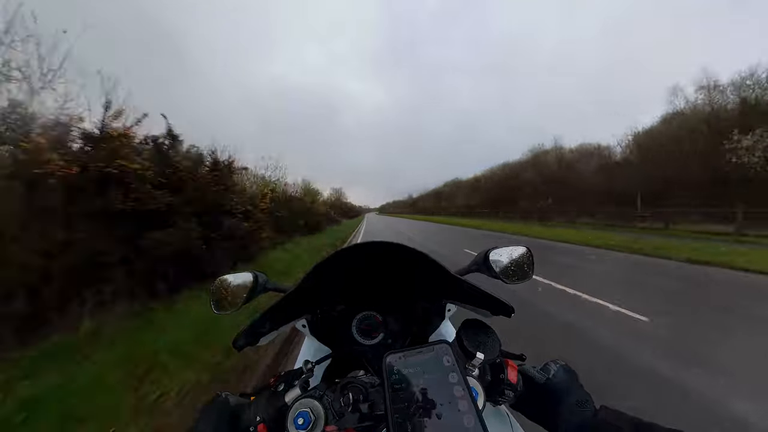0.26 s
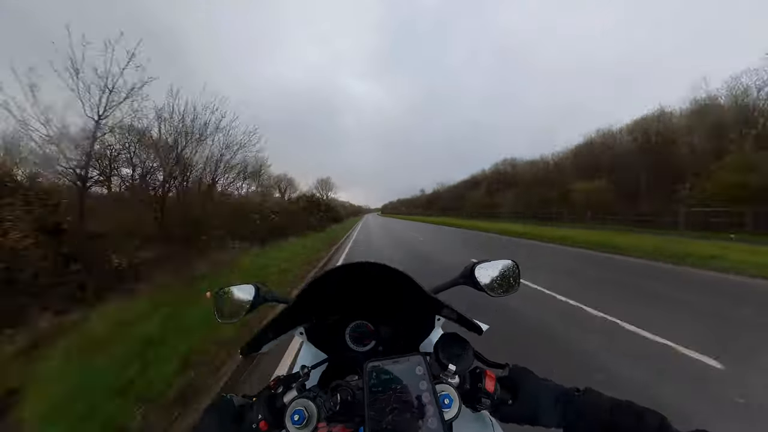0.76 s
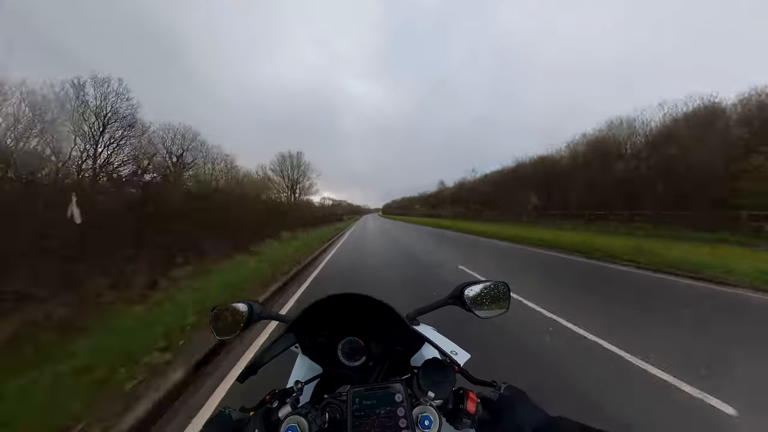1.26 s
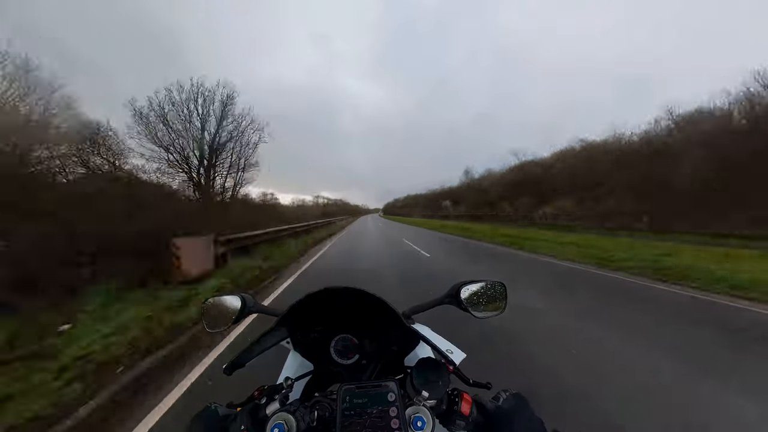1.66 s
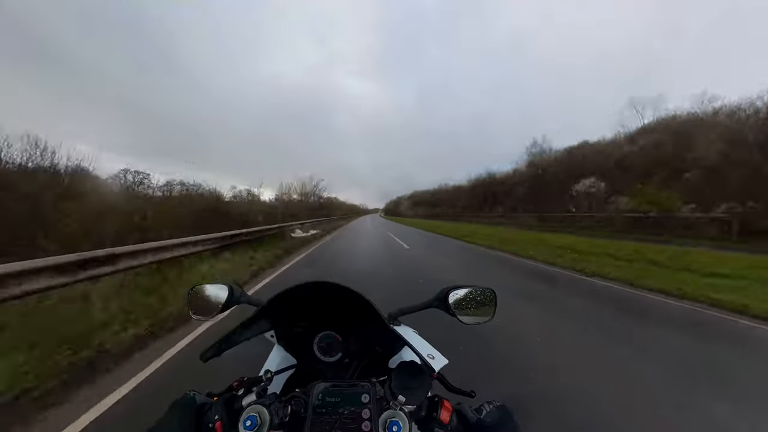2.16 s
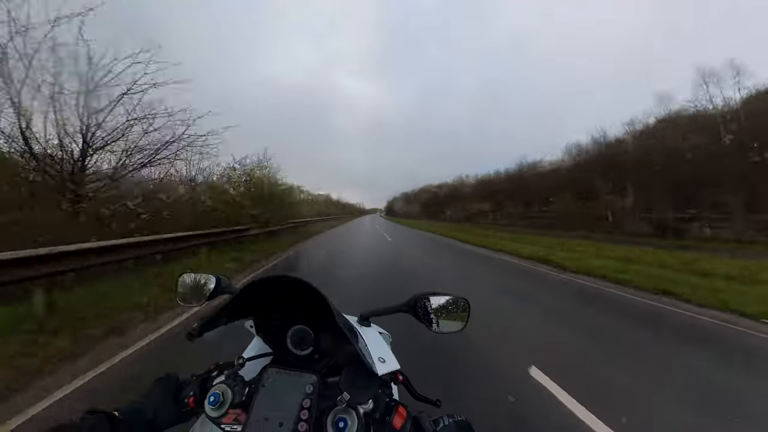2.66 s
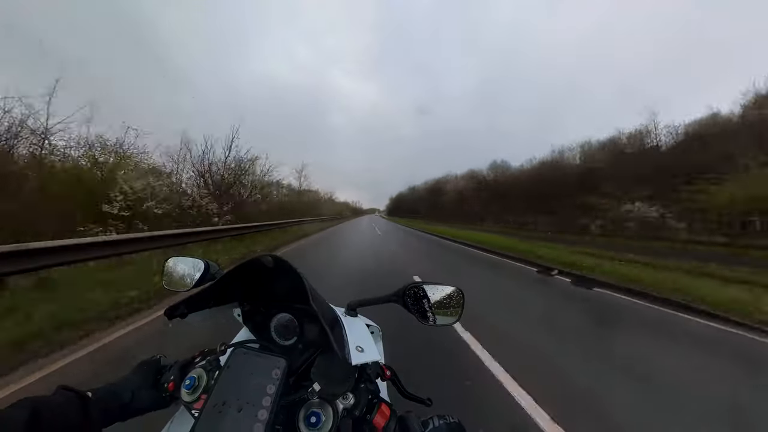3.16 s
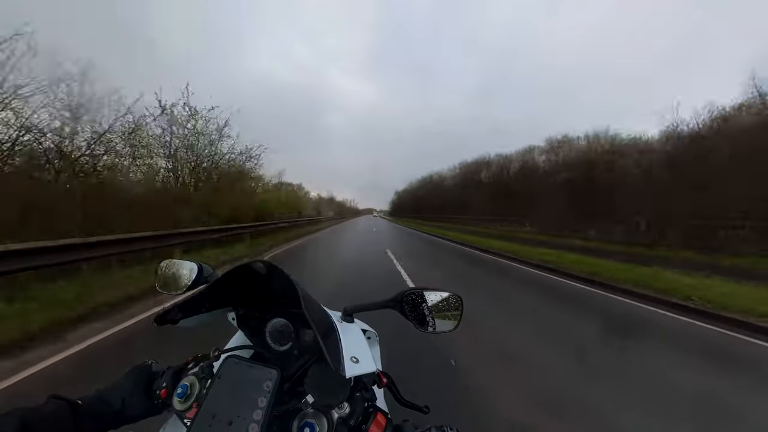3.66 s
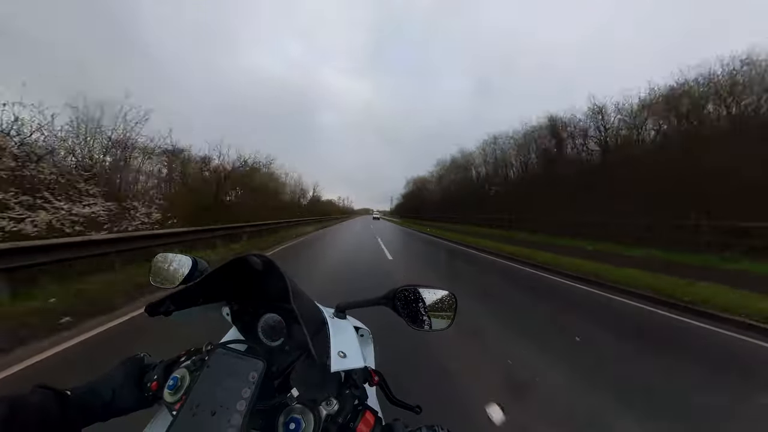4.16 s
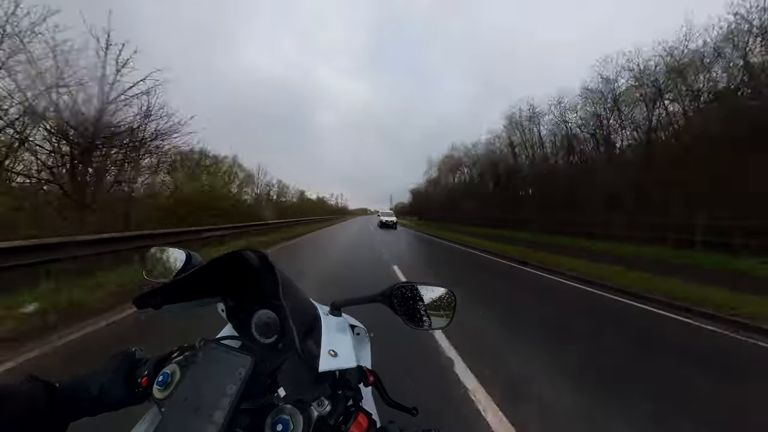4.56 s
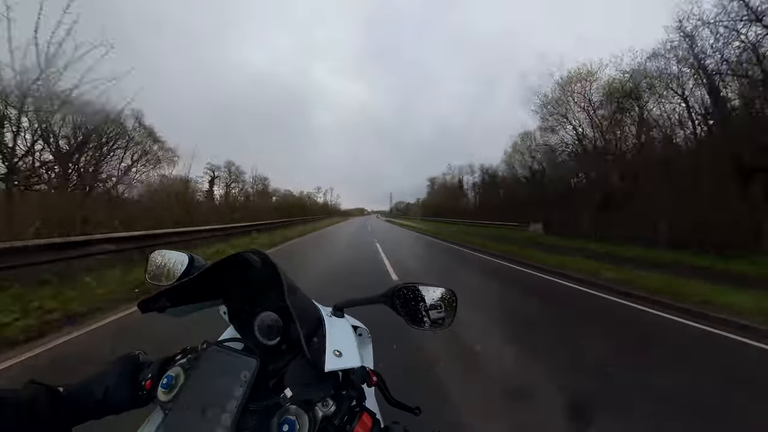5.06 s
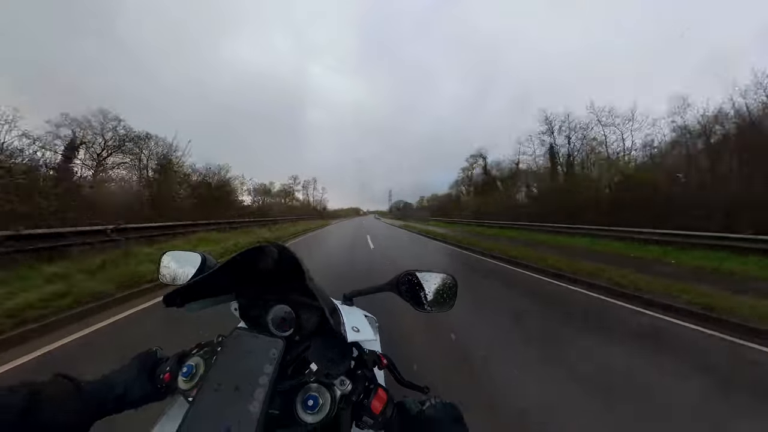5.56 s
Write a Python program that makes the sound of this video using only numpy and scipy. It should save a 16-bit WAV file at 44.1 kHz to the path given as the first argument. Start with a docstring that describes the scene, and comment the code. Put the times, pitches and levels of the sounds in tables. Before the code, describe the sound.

A four-cylinder motorcycle rides along a wet road, heard from a sheltered microphone on board. The engine pulls for about a second, with a brief rising whoop, then eases into a hum that slowly sinks in pitch. Wind thumps and roars throughout, tyres and spray hiss, and grit and drops tick irregularly on the bike's front shell.

```python
"""On a wet road, aboard a four-cylinder motorcycle. The firing cylinders hum as the engine pulls for
about a second, then eases off. Wind thumps and roars at the sheltered microphone, tyres and spray hiss,
and grit and drops tick on the fairing (the bike's front shell). A brief rising whoop sounds early on.
The recorder's gain control evens out the gusts."""
import sys
import numpy as np
from scipy import signal
from scipy.fft import rfft, irfft, next_fast_len
from scipy.io import wavfile
from scipy.ndimage import uniform_filter1d, map_coordinates

SR = 44100
rng = np.random.default_rng(int(sys.argv[2]) if len(sys.argv) > 2 else 0)


def log_audio(samples):
    """Write samples as a 16-bit WAV file to the path given in sys.argv[1]."""
    # one column per channel
    frames = np.atleast_2d(samples).T
    # limit to full scale, then quantise
    limited = np.clip(frames, -1, 1)
    pcm = np.round(limited * 32767).astype(np.int16)
    wavfile.write(sys.argv[1], SR, pcm)


N = 256662

# How often the cylinders fire: time_s, firing_hz
FIRING_RATE = [(0, 267.8), (.3, 272.4), (.62, 277.2), (.72, 276.6), (.85, 269.6), (1, 271.3), (1.4, 263),
               (2, 251.5), (2.4, 245.2), (2.6, 245.4), (2.85, 242), (3.4, 238.9), (4.2, 235.9), (5, 234.1),
               (5.55, 234.2), (5.68, 235.3), (5.82, 232)]
# How hard the engine works: time_s, hum_db, throttle (0 shut, 1 full)
ENGINE_EFFORT = [(0, -25.5, 0.96), (.3, -27, 0.77), (.55, -28.5, 0.91), (.68, -30.5, 0.72),
                 (.8, -30.5, 0.1), (1, -31.5, 0), (1.2, -28.5, 0.03), (1.7, -27, 0.1), (2.15, -29, 0),
                 (2.33, -33.5, 0), (2.5, -31, 0), (2.9, -30, 0), (3.4, -29, 0.2), (4.1, -30, 0),
                 (4.5, -29, 0.56), (5.3, -28, 0.34), (5.82, -33.5, 0.6)]
# Tones above the hum, by multiple of a quarter of the firing rate.
# Their levels next to the hum, by throttle: shut_db, half_db, full_db
OVERTONES = {5: (-21, -30, -30), 6: (-24, -26, -8), 7: (-29, -40, -30), 8: (-29, -18, -28),
             10: (-36, -23.5, -34), 11: (-40, -33, -42), 12: (-33, -37, -28), 14: (-42, -35, -26),
             15: (-38, -33, -42), 16: (-36, -44, -26), 18: (-42, -44, -41), 19: (-46, -41, -35),
             20: (-41, -44, -42), 21: (-46, -46, -36), 22: (-43, -39, -43), 23: (-43, -39, -41)}
# Gusts: time_s, wind_db (0 is average), buffet_db
GUSTS = [(.1, 3, -24), (.3, 0.5, -27.5), (.5, 3.5, -25.5), (.7, 2, -24), (.9, 1.5, -24.5),
         (1.3, 1.5, -27.5), (1.7, -0.5, -25.5), (2.1, -2, -28.5), (2.5, -1.5, -27.5), (2.9, 1, -26),
         (3.3, 0, -26.5), (3.6, 0.5, -29), (3.9, 0.5, -27), (4.2, 2, -25), (4.4, -1, -29), (4.7, 0, -27.5),
         (5.1, 0.5, -26.5), (5.45, 0.5, -28), (5.7, 0, -26.5)]
# Extra hiss from water on the road: time_s, wet_db
WETNESS = [(0, 3.5), (.45, -.5), (.7, 2.5), (.95, 0), (1.4, 0.5), (2.1, -1), (2.9, 0), (3.8, -.5),
           (4.6, -0.5), (5.2, 0), (5.82, 0.5)]
# The tone of each noise made by wind and spray: pitch_hz, level_db
BUFFET_TONE = [(30, -34.5), (60, 0.5), (90, 1), (150, -3.5), (210, -7.5), (300, -12), (450, -19.5),
               (700, -36), (1200, -96)]
RUMBLE_TONE = [(12, -48), (25, 1), (40, 17.5), (55, 13), (75, 3.5), (110, -12.5), (200, -62)]
ROAR_TONE = [(150, -29), (330, 5.5), (450, 3), (600, 3), (850, 1.5), (1100, -6), (1500, -13), (2000, -24.5),
             (3000, -73.5)]
SPRAY_TONE = [(900, -28.5), (1500, -4), (1800, -2), (2600, 0.5), (3300, -6.5), (4000, -11.5), (4800, -15.5),
              (5450, -14), (6200, -20), (6900, -28.5), (7600, -40), (8400, -53.5), (12000, -100)]
# The loudest grit hits: start_s, level_db, pitch_hz, width_octaves, treble_db (added to level_db)
GRIT_HITS = [(0.11, -39.5, 2700, 0.41, -9.5), (0.142, -48, 2610, 0.26, -3), (0.1642, -41, 3360, 0.25, -28),
             (0.1915, -33.5, 2650, 0.13, -14), (0.2075, -60, 4300, 0.2, 5), (0.255, -51, 3170, 0.26, -2),
             (0.2842, -50, 2970, 0.14, -2), (0.303, -48, 3650, 0.28, -2), (0.408, -43.5, 2330, 0.25, -6),
             (0.4677, -53, 4210, 0.16, -1), (0.6373, -51, 3170, 0.22, -1), (0.8366, -52, 3520, 0.38, -1),
             (0.9052, -58.5, 3650, 0.13, 7), (0.9831, -50, 3210, 0.18, -5), (0.993, -46, 3170, 0.3, -7.5),
             (1.047, -57, 3900, 0.2, 1), (1.0643, -49, 2800, 0.29, -5), (1.2518, -41, 2990, 0.16, -17),
             (1.2796, -39, 3020, 0.16, -27), (1.3218, -51, 2620, 0.22, -9.8),
             (1.3314, -40.5, 2870, 0.34, -8), (1.448, -45.5, 3310, 0.2, -10),
             (1.5396, -39.5, 3140, 0.33, -17), (1.5897, -51, 2780, 0.2, -18), (1.679, -43, 2960, 0.37, -13),
             (1.7094, -50, 4050, 0.31, -2), (1.8332, -42, 2500, 0.26, -25), (1.845, -39.5, 2890, 0.31, -13),
             (1.8561, -58, 3160, 0.25, 3), (1.876, -51, 2110, 0.13, -1.6), (1.9168, -48.5, 3690, 0.19, -26),
             (2.1575, -37, 2300, 0.37, -10), (2.1666, -52, 3830, 0.14, -18.5), (2.206, -44, 2780, 0.14, -9),
             (2.2192, -40, 3860, 0.23, -21), (2.308, -50, 4030, 0.13, -2), (2.507, -47, 2820, 0.24, -10),
             (2.389, -57, 4000, 0.3, 1), (2.5325, -41, 2740, 0.31, -10), (2.5908, -40.5, 3700, 0.4, -14),
             (2.6912, -47, 2820, 0.31, -21), (2.7316, -46, 3630, 0.15, -9.0),
             (2.8149, -41, 2550, 0.33, -9.5), (2.8977, -55, 2990, 0.34, -1), (2.9072, -42, 3140, 0.22, -17),
             (2.9591, -46.5, 3020, 0.37, -0.5), (2.9855, -49, 3310, 0.24, -15),
             (3.0603, -44, 2970, 0.19, -28), (3.12, -44, 3790, 0.26, -11), (3.1456, -42, 2310, 0.26, -19),
             (3.2295, -56.2, 4330, 0.13, 6), (3.2594, -48, 2720, 0.46, -7.6),
             (3.2663, -37, 3150, 0.29, -18), (3.2725, -49, 3810, 0.16, -11), (3.3387, -46, 2840, 0.32, -12),
             (3.345, -42, 2670, 0.18, -18), (3.366, -43, 2680, 0.36, -7), (3.3891, -42, 3380, 0.24, -8.9),
             (3.4056, -49, 3460, 0.31, -4), (3.421, -46.4, 3870, 0.2, -12.5), (3.459, -48, 4050, 0.13, -9),
             (3.5163, -54.3, 4310, 0.13, -3.1), (3.5223, -47, 2490, 0.47, -4),
             (3.551, -44, 3480, 0.16, -14.4), (3.6036, -42.5, 2840, 0.33, -12),
             (3.665, -40.5, 3050, 0.29, -10), (3.8114, -41, 4020, 0.19, -9),
             (3.828, -44.7, 2530, 0.45, -15), (3.857, -49, 3860, 0.14, -1), (3.884, -60, 4200, 0.2, 5),
             (3.9184, -46, 3170, 0.15, -16), (4.0501, -43.5, 2600, 0.14, -20),
             (4.106, -43.5, 2560, 0.43, -8.5), (4.1598, -54, 2470, 0.44, 1),
             (4.1776, -39.5, 2830, 0.34, -9), (4.2432, -42, 2500, 0.29, -20),
             (4.255, -40.5, 3000, 0.19, -23), (4.519, -51, 4000, 0.12, -21), (4.532, -53, 3090, 0.16, 0),
             (4.538, -39.5, 2620, 0.41, -11), (4.5448, -32.5, 3480, 0.14, -13),
             (4.551, -46, 3220, 0.2, -21), (4.6103, -43.9, 3790, 0.37, -3), (4.625, -47, 2980, 0.28, -12),
             (4.634, -43.5, 2400, 0.42, -4), (4.6916, -46, 2900, 0.25, -23), (4.749, -41, 2660, 0.13, -23),
             (4.7545, -47.1, 2800, 0.2, -18), (4.9051, -49.5, 2750, 0.29, -8),
             (4.9461, -55, 3070, 0.38, -1), (5.0134, -48, 2300, 0.43, -5), (5.09, -38, 2720, 0.11, -30),
             (5.0967, -41.5, 3000, 0.24, -12), (5.195, -38.5, 3240, 0.31, -9.5),
             (5.2524, -45, 2520, 0.2, -24), (5.2938, -41.5, 3350, 0.21, -24), (5.322, -57, 4200, 0.2, 1),
             (5.367, -42, 3160, 0.21, -14.3), (5.427, -33.5, 3200, 0.27, -17),
             (5.4903, -54.5, 2230, 0.36, -6), (5.5472, -41.8, 2770, 0.24, -19.5),
             (5.5527, -45, 2860, 0.22, -11), (5.615, -41, 3780, 0.13, -4.5),
             (5.649, -35.5, 2700, 0.28, -18), (5.6587, -37, 3380, 0.17, -20),
             (5.7007, -40.5, 2680, 0.36, -12), (5.758, -60, 4150, 0.2, 9), (5.7702, -41, 3510, 0.32, -10.6)]
# The notes the fairing rings at: pitch_hz, level_db, ring_s (time to fade by 60 dB)
FAIRING_NOTES = [(1250, -1.5, .015), (1690, 1.5, .015), (2110, 3.5, 0.019), (2440, 2.5, 0.014),
                 (2630, 1.5, 0.016), (3023, 3.5, 0.014), (3400, 1.5, 0.013), (3970, 2.5, 0.014),
                 (4390, 2, 0.014), (5336, 2, 0.0093), (6000, -4, 0.0091), (6550, -9, 0.011),
                 (7350, -15, 0.0071)]
# How the microphone's housing colours the treble: pitch_hz, gain_db
HOUSING_TONE = [(3100, 0), (3500, -1), (3950, 1.5), (4400, 0.5), (4800, -1.5), (5150, 1.5)]


def amp(db):
    """Turn decibels into a gain."""
    return 10 ** (np.asarray(db) / 20)


def unit(x):
    """Scale x to an average (rms) level of 1."""
    return x / np.sqrt(np.mean(x ** 2) + 1e-20)


def curves(rows):
    """One value per sample for each column after the time."""
    time_s, *columns = np.transpose(rows)
    return [np.interp(np.arange(N) / SR, time_s, column) for column in columns]


def wobble(rate_hz):
    """A smooth curve through rate_hz random points a second."""
    points = rng.standard_normal(int(N * rate_hz / SR) + 4)
    return map_coordinates(points, [np.arange(N) * rate_hz / SR])


def filtered(x, gain_at):
    """Scale each frequency in x by gain_at(hz)."""
    size = next_fast_len(N + 8192)
    return irfft(rfft(x, size) * gain_at(np.fft.rfftfreq(size, 1 / SR)), size)[:N]


def colour(x, tone):
    """Shape x with a tone table and bring it to level 1."""
    pitch_hz, db = np.transpose(tone)
    return unit(filtered(x, lambda hz: amp(np.interp(np.log(hz + 1), np.log(pitch_hz), db))))


def engine():
    """Firing cylinders make a hum. They are not quite equal, adding tones that change with throttle."""
    (firing_hz,) = curves(FIRING_RATE)
    hum_db, throttle = curves(ENGINE_EFFORT)
    cycle = np.pi / 2 * np.cumsum(firing_hz) / SR  # one turn for every four firings
    sound = amp(1.1 * wobble(10)) * np.sin(4 * cycle + .12 * wobble(15))  # the fuel burns unevenly
    for multiple, levels_db in OVERTONES.items():
        level_db = np.interp(throttle, [0, .5, 1], levels_db) + 1.2 * wobble(7) + 1.8 * wobble(30)
        phase = multiple * cycle + .045 * multiple * wobble(16) + rng.uniform(0, 2 * np.pi)
        sound += amp(level_db) * np.sin(phase)
    return np.sqrt(2) * amp(hum_db) * sound


def eddies(count, spread_db):
    """Swirls of air kick the microphone at random, pushing more often than pulling."""
    when, direction, strength = rng.uniform(size=(count, 3)).T
    kicks = np.sign(direction - .3) * amp(-spread_db * np.log(strength))
    return unit(np.bincount((when * N).astype(int), kicks, N))


def rush(patchy_db):
    """Rushing noise, with louder and softer patches across pitch and time."""
    spectrum = signal.stft(rng.standard_normal(N), nperseg=512)[2]
    patches = uniform_filter1d(rng.standard_normal(spectrum.shape), size=6, axis=0)
    patches = uniform_filter1d(patches, size=5, axis=1)
    return signal.istft(spectrum * amp(patchy_db * unit(patches)), nperseg=512)[1][:N]


def wind_and_spray():
    """Swirling air thumps the microphone; each sharp swirl brings a puff of roar and spray hiss."""
    wind_db, buffet_db = curves(GUSTS)
    (wet_db,) = curves(WETNESS)
    flutter = wobble(22)
    kicks = eddies(count=900, spread_db=0.16)
    buffet = colour(0.79 * kicks + amp(2.0 * flutter) * unit(rush(patchy_db=-1.53)), BUFFET_TONE)
    rumble = colour(rush(patchy_db=-2.5), RUMBLE_TONE)
    swing = uniform_filter1d(np.gradient(buffet) ** 2, size=500)  # how fast the pressure swings
    swing_db = 10 * np.log10(np.abs(swing) / swing.mean() + 0.14)
    roar_puffs = amp(0.17 * swing_db + 0.45 * wobble(30) + 0.49 * flutter)
    roar = colour(0.43 * kicks + roar_puffs * unit(rush(patchy_db=1.0)), ROAR_TONE)
    hiss_puffs = amp(0.24 * swing_db + 0.66 * wobble(12) + 1.3 * wobble(70))
    hiss = colour(hiss_puffs * rush(patchy_db=0.5), SPRAY_TONE)
    # Stronger wind means less rumble, but more roar and hiss.
    return (amp(buffet_db) * buffet
            + amp(-33.5 - 1.6 * wind_db) * rumble
            + amp(-43.5 + 0.97 * wind_db) * roar
            + amp(-59.5 + 0.62 * wind_db + wet_db) * hiss)


def pings(start_s, level_db, pitch_hz, ring_s):
    """One note of the fairing rings at every hit, rattles slightly and dies away."""
    size = 500
    t = np.arange(size) / SR
    rise = (1 - np.exp(-t / 0.00039)) ** 2
    fade = amp(level_db[:, None] - 60 * t / ring_s)
    rattle = .055 * np.cumsum(rng.standard_normal((len(start_s), size)), axis=1)
    wave = fade * rise * np.sin(2 * np.pi * pitch_hz[:, None] * t + rattle)
    at = np.round(start_s * SR).astype(int)[:, None] + np.arange(size)
    return np.bincount(at.ravel(), wave.ravel(), N + size)[:N]


def faint_hits(count, width_octaves, treble_db):
    """Further, fainter hits land at random, most of them softly. Gives rows like those of GRIT_HITS."""
    when, size, pitch, brightness = rng.uniform(size=(count, 4)).T
    return np.transpose([when * N / SR, -62 + 8 * size ** 2.1, 2300 * 1.7 ** pitch,
                         np.full(count, width_octaves), treble_db + 14 * (brightness - .5)])


def grit_and_drops():
    """Each hit shares its strength among the fairing's notes near its pitch; treble notes ring too."""
    hits = np.vstack([faint_hits(count=540, width_octaves=0.18, treble_db=-8), GRIT_HITS])
    start_s, hit_db, hit_hz, width_octaves, treble_db = hits.T
    note_hz, note_db, ring_s = FAIRING_NOTES_BY_COLUMN = np.transpose(FAIRING_NOTES)
    below_treble = note_hz < 4800
    distance = np.log2(note_hz / hit_hz[:, None]) / width_octaves[:, None]
    share = np.exp(-distance ** 2 / 2) * below_treble + 1e-6
    share_db = 10 * np.log10(share / share.sum(axis=1, keepdims=True))
    level_db = hit_db[:, None] + note_db + np.where(below_treble, share_db, treble_db[:, None])
    chance = rng.standard_normal((len(hits), 2, len(note_hz)))  # no two hits sound alike
    level_db += 1.4 * chance[:, 0]
    pitch_hz = note_hz * (1 + .02 * chance[:, 1])
    return sum(pings(start_s, level_db[:, k], pitch_hz[:, k], ring_s[k]) for k in range(len(note_hz)))


def whoop(middle_s=.655, half_length_s=.095, pitch_hz=856, climb_hz_per_s=400, throb_hz=19):
    """A slightly rough tone swells, climbs and fades, throbbing as it goes."""
    t = np.arange(N) / SR - middle_s
    swell_db = -41 - 10 * (t / half_length_s) ** 4
    throb_db = 4 * np.cos(2 * np.pi * throb_hz * t)
    rough_db, waver = 3 * wobble(80), .8 * wobble(60)
    phase = 2 * np.pi * (pitch_hz * t + climb_hz_per_s * t ** 2 / 2)
    return amp(swell_db + throb_db + rough_db) * np.sin(phase + waver)


def scene():
    """Add all the sounds into one channel."""
    return (engine() + wind_and_spray() + grit_and_drops() + whoop())[None]


def record(dry):
    """The housing colours the sound; gain control turns loud moments down and quiet ones up."""
    pitch_hz, gain_db = np.transpose(HOUSING_TONE)
    sound = filtered(dry[0], lambda hz: amp(np.interp(hz, pitch_hz, gain_db)))
    level = np.sqrt(np.abs(uniform_filter1d(sound ** 2, size=1400)) + 1e-9)  # over about 32 ms
    sound = sound * (level / amp(-24.0)) ** -.35
    sound = sound / (1 + np.abs(sound / .2) ** 6) ** (1 / 6)  # round off the peaks
    return filtered(sound, lambda hz: 1 / (1 + (hz / 8000) ** 24))[None]  # cut the highest treble


dry = scene()
out = record(dry)
log_audio(out)
```